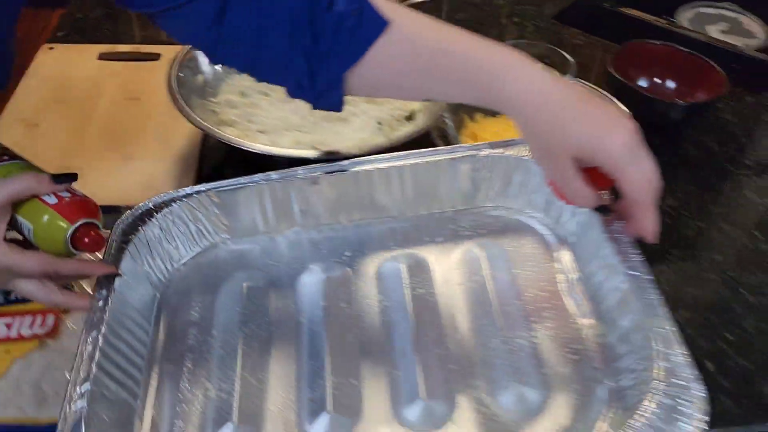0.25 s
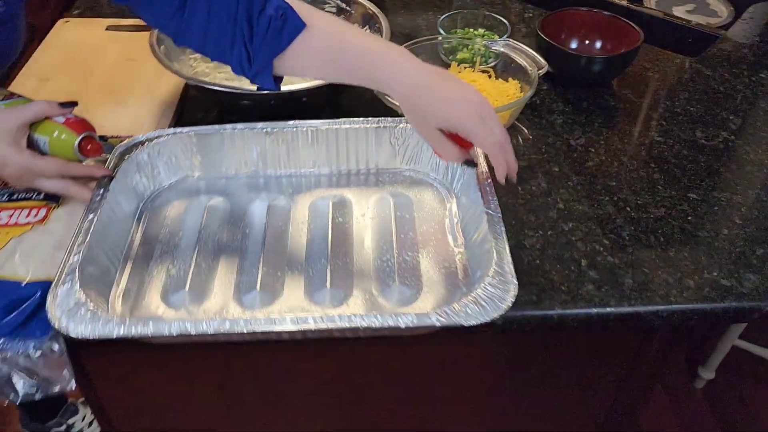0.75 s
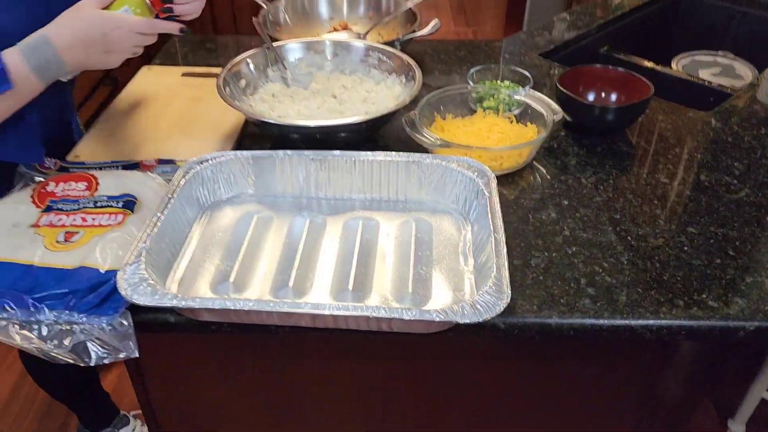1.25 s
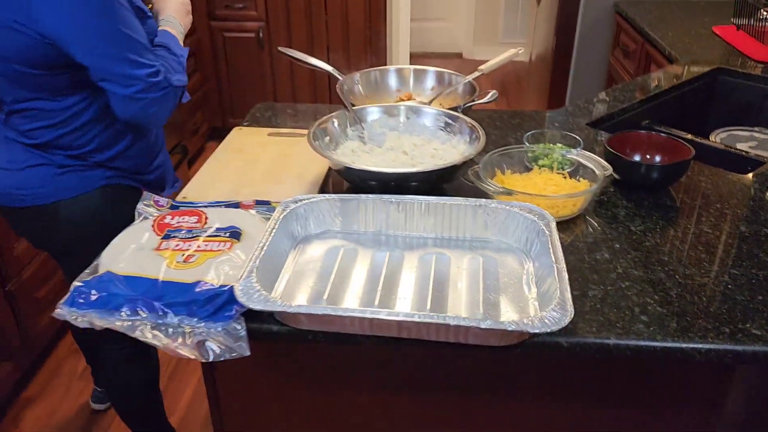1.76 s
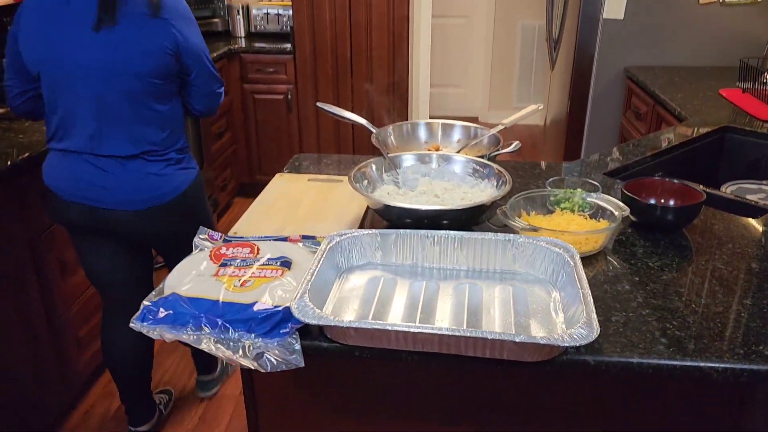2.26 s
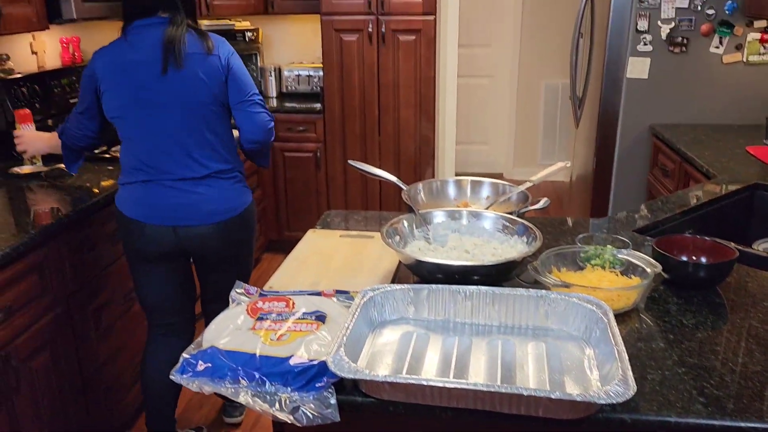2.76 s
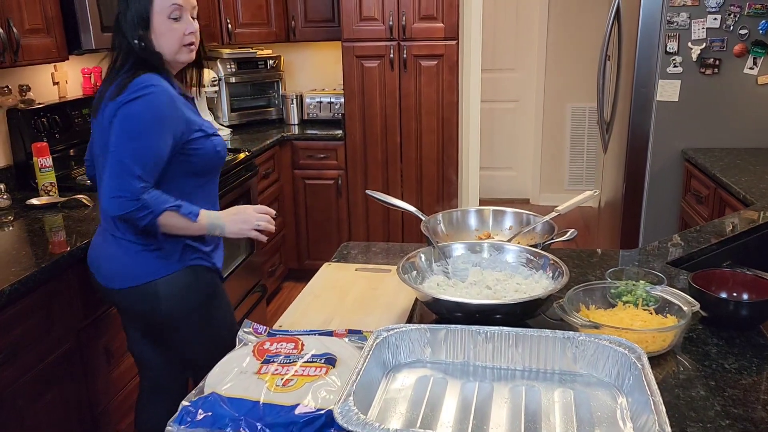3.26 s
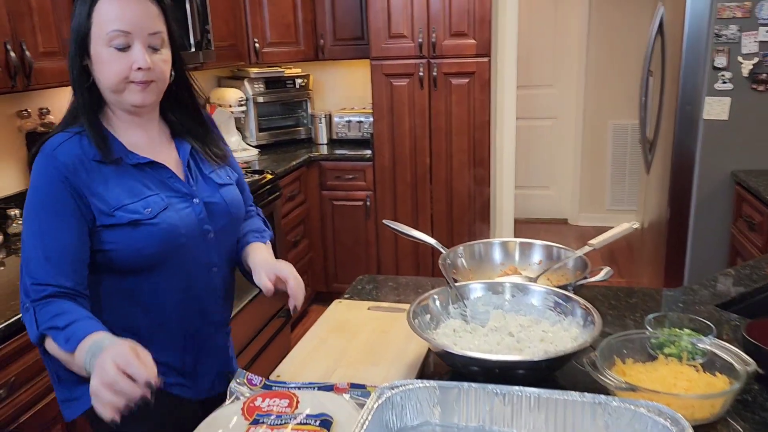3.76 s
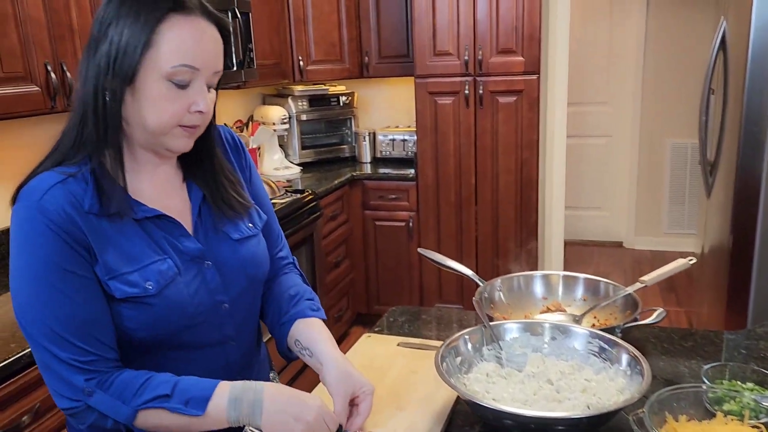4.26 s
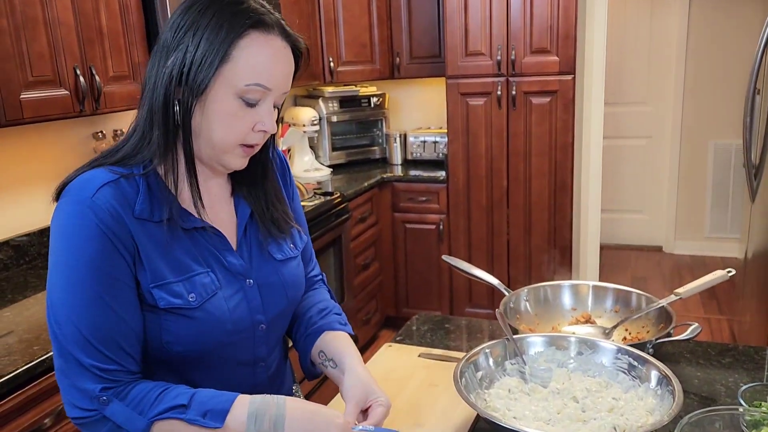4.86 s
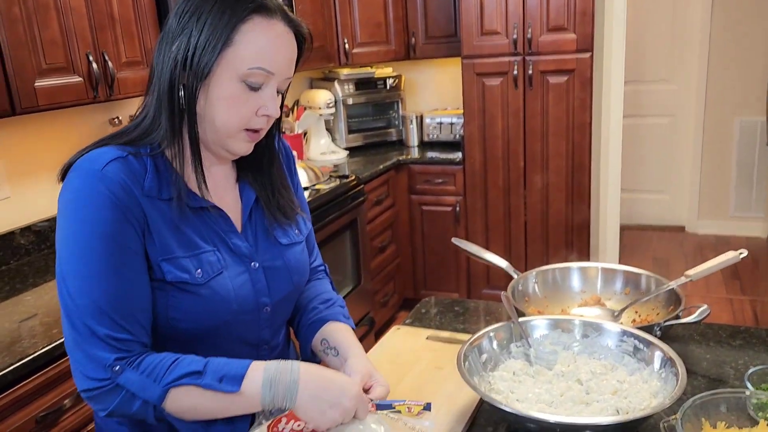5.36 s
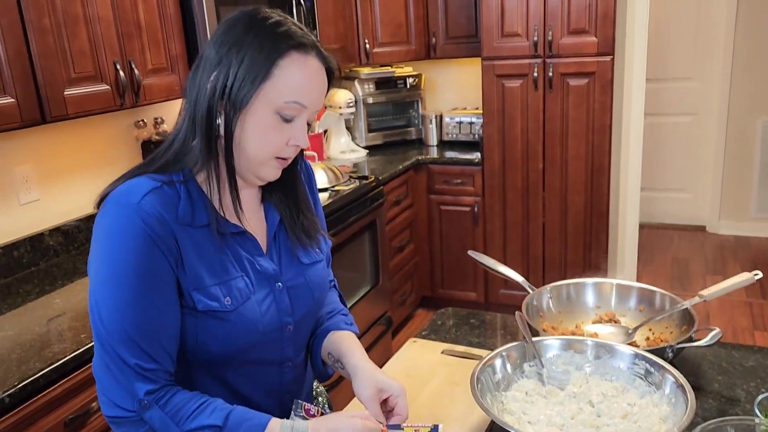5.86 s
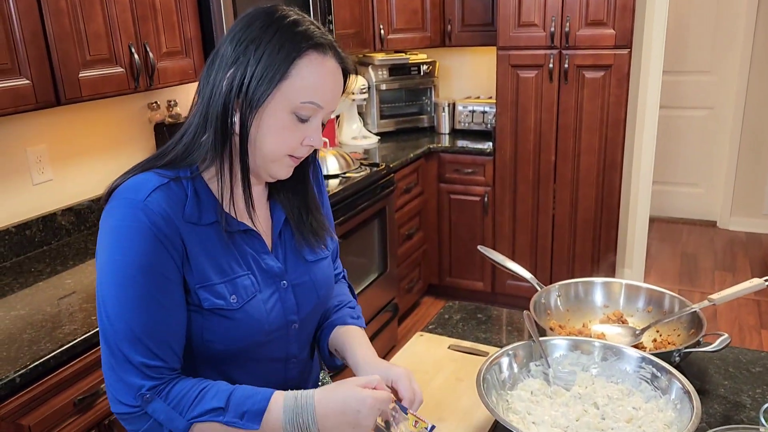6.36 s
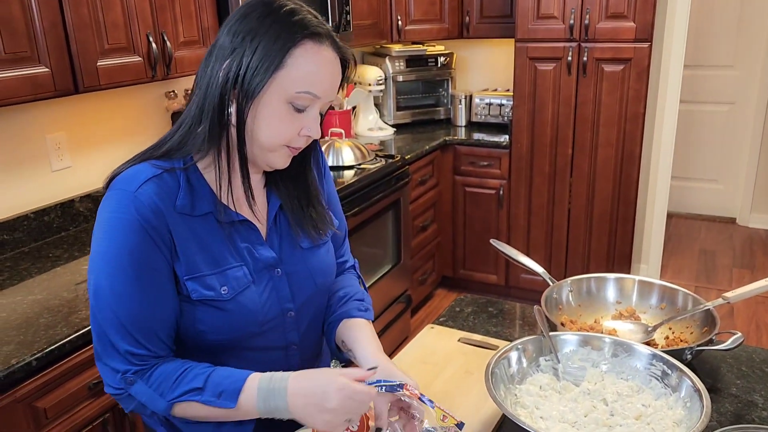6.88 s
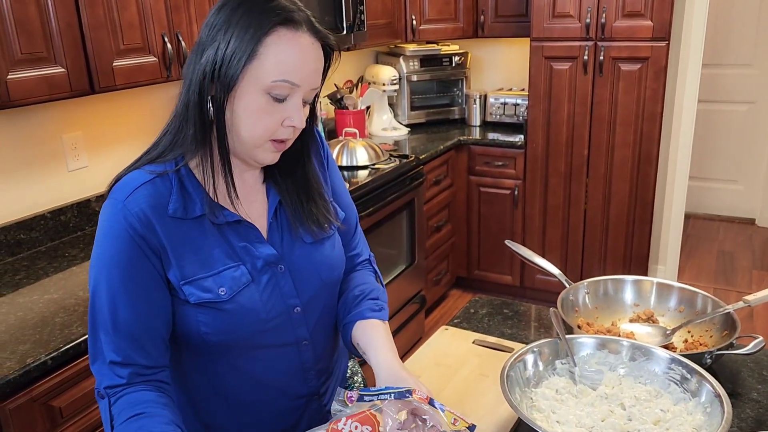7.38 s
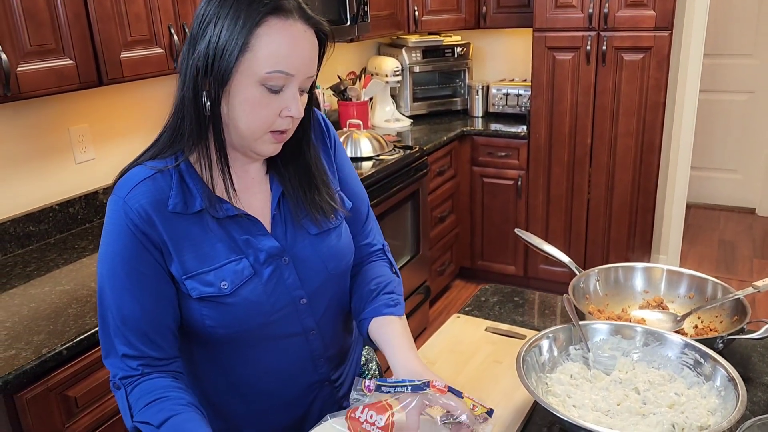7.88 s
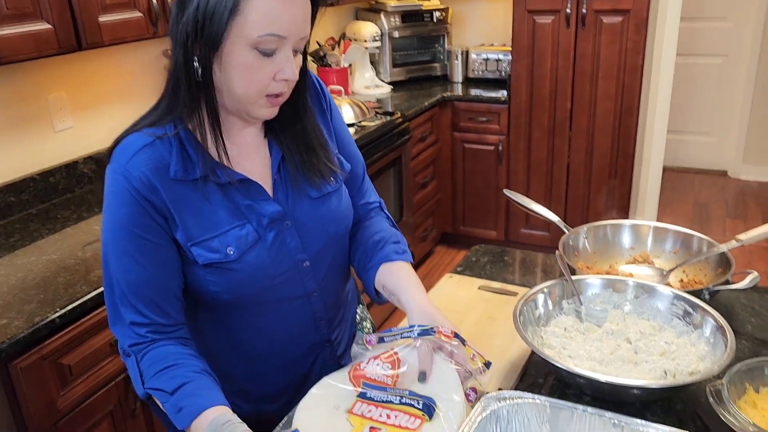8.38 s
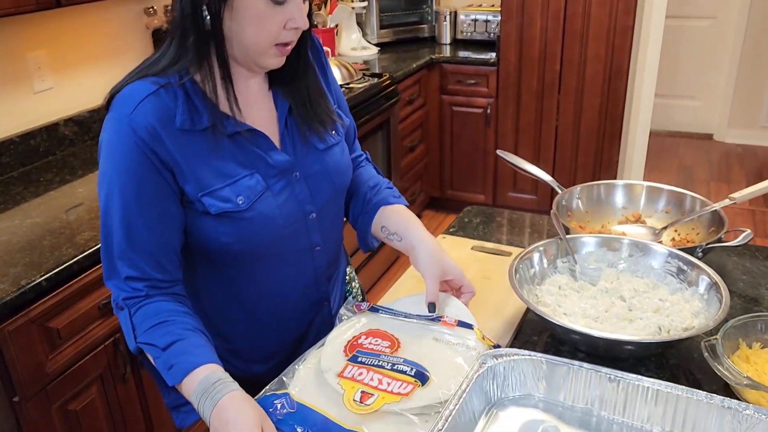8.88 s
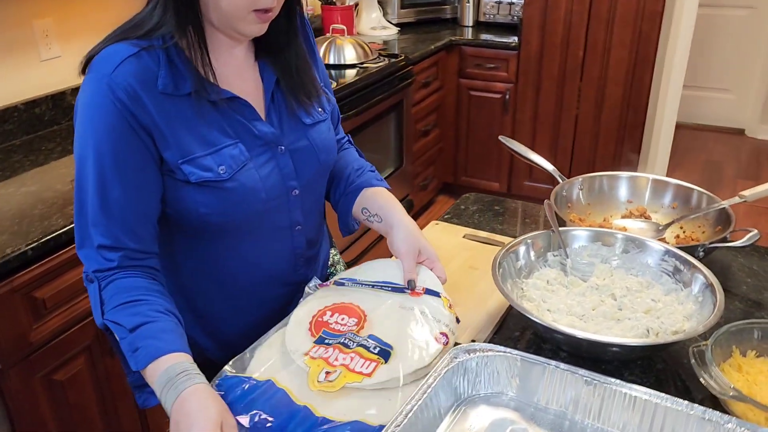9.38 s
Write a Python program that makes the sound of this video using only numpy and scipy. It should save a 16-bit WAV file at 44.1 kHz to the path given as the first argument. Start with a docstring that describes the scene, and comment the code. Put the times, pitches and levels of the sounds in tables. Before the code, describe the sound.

A tiny spray spurt, a foil pan knocking on stone, a can capped and set down, then a plastic bag popped open and crinkled.

```python
"""An oil spray gives a last short spurt as foil brushes, over the low hum of appliances in a kitchen.
A foil pan then knocks on the stone counter, and the can is capped and set down further off.
At last a plastic bag's zip pops open and the bag is crinkled and pulled back. Shaped noise makes the hiss,
hum and rumble, short pushes and ringing tones the knocks, and random tiny buckles the crinkling.
Hard cabinets ring briefly after each sound; a hand-held phone hears it all at two ports."""
import sys
import numpy as np
from scipy import signal
from scipy.fft import rfft, irfft, next_fast_len
from scipy.io import wavfile
from scipy.ndimage import uniform_filter1d

SR = 44100
rng = np.random.default_rng(int(sys.argv[2]) if len(sys.argv) > 2 else 0)


def output_pcm(signal):
    """Save a mono or channel-first signal as 16-bit PCM at the path in sys.argv[1].

    Samples are clipped to [-1, 1] before scaling.
    """
    pcm = np.clip(np.atleast_2d(signal).T, -1, 1) * 32767
    wavfile.write(sys.argv[1], SR, np.round(pcm).astype(np.int16))


N = 424683
TIME = np.arange(N) / SR
RING = TIME[:SR // 2]  # the half second in which one short sound dies away
PORT_GAP_M = 0.15
LEAD_OBJECTS, LEAD_BAG = 8, 3  # samples by which the left port hears the sound first


def amp(db):
    """Turn decibels into gain."""
    return 10 ** (np.asarray(db) / 20)


def along(points, hz):
    """Read a value between (frequency, value) points, on a log-frequency axis."""
    f, value = np.transpose(points)
    return np.interp(np.log(hz + 1e-3), np.log(f), value)


def colour(x, points, tilt_db=0):
    """Filter with the given spectrum, never ringing ahead of the sound; tilt is in dB per octave."""
    size = 2 * next_fast_len(len(x) // 2 + SR // 20)
    hz = np.arange(size // 2 + 1) * SR / size
    # the tilt turns about 1500 Hz and is flat outside 500 to 5000 Hz
    db = along(points, hz) + tilt_db * np.log2(np.clip(hz, 500, 5000) / 1500)
    # folding the cepstrum (spectrum of the log spectrum) gives the filter that responds soonest
    cepstrum = irfft(np.log(amp(db)))
    cepstrum[1:size // 2] *= 2
    cepstrum[size // 2 + 1:] = 0
    response = np.exp(rfft(cepstrum))
    return irfft(rfft(x, size) * response, size)[:len(x)]


def unit(x):
    """Scale to an average (rms) level of 1."""
    return x / np.sqrt(np.mean(x ** 2))


def crest(x, size=132):
    """Scale so that the loudest three milliseconds have rms 1."""
    return x / np.sqrt(uniform_filter1d(x ** 2, size).max())


def fade(t60):
    """Exponential decay that falls 60 dB in t60 seconds."""
    return amp(-60 * RING / max(t60, 1e-4))


def add(track, s, x):
    """Mix x into the track from time s, in seconds."""
    i = max(int(s * SR), 0)
    track[i:i + len(x)] += x[:N - i]


def panned(x, pan_db):
    """Lean a stereo sound to the left by pan_db; a negative value leans it right."""
    return x * amp(np.array([[pan_db], [-pan_db]]) / 2)


def stroke(start_s, hold_s, db, growth_db, attack_s, release_s):
    """Gain of one movement: an attack, a hold that grows by growth_db around its level, and a release."""
    hold_s, gain = max(hold_s, 1e-3), np.zeros(N)
    t = TIME[:int((hold_s + release_s) * SR)]
    level_db = db + growth_db * (np.minimum(t / hold_s, 1) - 0.5)
    rise = np.minimum(t / attack_s, 1)
    fall = np.exp(-np.log(1000) * np.maximum(t - hold_s, 0) / release_s)  # 60 dB in release_s
    add(gain, start_s, rise * amp(level_db) * fall)
    return gain


def diffuse(size):
    """Spectrum of noise from all sides at two ports: alike in the bass, unrelated in the treble."""
    mid, side = rfft(rng.standard_normal((2, size)))
    hz = np.arange(len(mid)) * SR / size
    alike = 0.98 * np.sinc(2 * hz * PORT_GAP_M / 343)  # 343 m/s is the speed of sound
    shared = mid * np.sqrt((1 + alike) / 2)
    opposed = side * np.sqrt((1 - alike) / 2)
    return hz, shared + np.array([[1], [-1]]) * opposed


# how long the room rings at each pitch: (frequency [Hz], time to fall 60 dB [s])
ROOM_DECAY = [(200, 0.38), (700, 0.4), (2000, 0.38), (5000, 0.38), (10000, .33), (15000, 0.25)]


def kitchen(x, room_db, lead, gap_s=0.0012, build_s=0.0008):
    """Direct sound, at the left port `lead` samples early, and a dense tail from cabinets and stone."""
    hz, noise = diffuse(len(RING))
    build_up = 1 - np.exp(-np.maximum(RING - gap_s, 0) / build_s)
    edges = np.append(0, SR / 2 ** np.arange(8.5, 0.9, -0.5))  # half-octave bands
    tail = 0
    for lo, hi in zip(edges, edges[1:]):
        band = irfft(noise * ((hz >= lo) & (hz < hi)), len(RING))
        band = band * fade(along(ROOM_DECAY, (lo + hi) / 2)) * build_up
        tail = tail + unit(band) * np.sqrt((hi - lo) * 2 / SR / len(RING))
    direct = np.array([x, np.pad(x, (lead, 0))[:N]])
    return direct + amp(room_db) * signal.fftconvolve(x[None], tail)[:, :N]


def contact(rattle_db, t60, size=121, rise_share=0.23):
    """One sharp push and the brief irregular chatter that follows it, with no colour of its own."""
    chatter = rng.standard_normal(len(RING)) * (fade(t60) - fade(t60 * rise_share))
    push = amp(rattle_db) * unit(chatter) / np.sqrt(len(RING))
    push[0] += 1
    # even out the broad shape of the spectrum
    power = uniform_filter1d(np.abs(rfft(push)) ** 2, size)
    flatten = np.c_[np.linspace(1, SR / 2, len(power)), -10 * np.log10(power + 0.02)]
    return colour(push, flatten)


# bright edge of ticks: (frequency [Hz], level [dB])
TICK_SPECTRUM = [(600, -14.5), (2000, -3.5), (4000, 4), (5700, 5.5), (9000, -2.5), (12000, -3), (15500, -4)]


def knocks(rows, spectrum, modes, tick_colour, ring_db, rattle_db, rattle_s, tick_s):
    """Each blow gives a coloured thud, a bright tick, and sets the object's modes (own tones) ringing."""
    out = np.zeros(N)
    for s, body_db, tick_db, tilt_db in rows:
        thud = crest(colour(contact(rattle_db, rattle_s), spectrum, tilt_db))
        ring = 0
        for hz, db, t60 in modes:
            struck_hz = hz * (1 + 0.0018 * rng.standard_normal())  # a little different at every blow
            ring = ring + amp(db) * fade(t60) * np.sin(2 * np.pi * struck_hz * RING)
        body = thud + amp(ring_db) * crest(ring)
        tick = crest(colour(contact(6.5, tick_s), tick_colour))
        add(out, s, amp(body_db) * body + amp(tick_db) * tick)
    return out


# tones of a buckling patch: (multiple of its pitch, level [dB])
PATCH_TONES = [(.76, -4), (1, 8), (1.2, -3.5)]
# lower sound of shaken sheets, also used by rustle: (frequency [Hz], level [dB])
FLUTTER_SPECTRUM = [(250, -7), (500, -7), (750, 1.5), (1150, -1), (1500, 3), (2100, 6), (2900, -5.5),
                    (4500, -4), (8000, -60)]


def snaps(rows, swing_s, tick_s, body_db, tick_db, thump_db):
    """A patch buckles and swings briefly around its own pitch, with a bright tick from its edge."""
    out = np.zeros(N)
    for s, swing_db, hz, edge_db in rows:
        swing = sum(amp(db) * np.sin(2 * np.pi * ratio * hz * RING) for ratio, db in PATCH_TONES)
        swing = swing * fade(swing_s) * (1 - np.exp(-hz * RING))  # it builds up over about one cycle
        thump = crest(colour(contact(0, 0.0048), FLUTTER_SPECTRUM))
        body = crest(crest(swing) + amp(thump_db) * thump)
        tick = crest(colour(contact(53, tick_s), TICK_SPECTRUM))
        add(out, s, amp(body_db + swing_db) * body + amp(tick_db + edge_db) * tick)
    return out


def creases(per_s, spread_db, bunching=0.8, size=350):
    """Random tiny buckles of very unequal size, whose chance rises and falls so they come in bunches."""
    bunch = np.exp(bunching * unit(uniform_filter1d(rng.standard_normal(N), size)))
    chance, sign, strength = rng.random(N), rng.choice([-1, 1], N), rng.exponential(size=N)
    happens = chance < per_s / SR * bunch / bunch.mean()
    return happens * sign * amp(spread_db * np.minimum(strength, 4))


# bright crackle of small creases: (frequency [Hz], level [dB])
CRACKLE_SPECTRUM = [(1500, -6.5), (3000, 4.5), (4500, 1.5), (7000, -3.5), (9500, -6), (12000, -0.5),
                    (15500, -6)]


def rustle(moves, per_s, spread_db, crackle_db, flutter_db):
    """Small creases crackle brightly; the same buckles and larger folds shake the sheet lower down."""
    fine, folds = creases(per_s, spread_db), creases(per_s, spread_db)
    crackle = unit(colour(fine, CRACKLE_SPECTRUM))
    flutter = unit(colour(0.33 * fine + folds, FLUTTER_SPECTRUM))
    high, low = np.zeros(N), np.zeros(N)
    for start_s, hold_s, db, growth_db, over_db in moves:
        # a hand takes up the sheet over a share of the movement; the sheet settles once it stops
        effort = stroke(start_s, hold_s, db, growth_db, attack_s=0.083 * hold_s, release_s=0.24)
        high = np.maximum(high, effort)
        low = np.maximum(low, effort * amp(over_db))
    return amp(crackle_db) * crackle * high + amp(flutter_db) * flutter * low


# spectrum of the steady fan noise: (frequency [Hz], level [dB])
FAN_SPECTRUM = [(18, -39), (30, -14), (133, -8.5), (208, -14.5), (243, -11.5), (270, -15.5), (292, -16),
                (369, -12), (467, -19.5), (518, -21), (561, -26), (656, -27), (1020, -32), (2180, -30.5),
                (15500, -57)]
# appliance drone in the room: (frequency [Hz], width [Hz], level [dB])
HUMS = [(98.7, 15.7, -53.5), (135.2, 6.6, -57), (237.9, 8.2, -58.5), (299, 75, -66.5), (380.6, 42, -61.5)]


def appliances(fan_db=-49.5):
    """Steady fan noise with a few wavering hums, each a band of noise around its own pitch."""
    size = next_fast_len(N)
    hz, noise = diffuse(size)
    out = amp(fan_db) * unit(irfft(noise * amp(along(FAN_SPECTRUM, hz)), size))
    hz, noise = diffuse(size)
    for centre, width, db in HUMS:
        out += amp(db) * unit(irfft(noise / (1 + ((hz - centre) / width * 2) ** 2), size))
    return out[:, :N]


# feet tread the floor and the hand that holds the phone shifts: (start [s], hold [s], level [dB])
SHUDDERS = [(0.58, 0.1, -46), (1.33, 0.28, -51.5), (1.88, 0.13, -51), (2.298, 0.13, -43), (2.65, 0.25, -54),
            (3.25, 0.17, -48), (8.405, 0.22, -55)]
# their deep sound: (frequency [Hz], level [dB])
RUMBLE_SPECTRUM = [(15, -44), (30, 4.5), (60, -4.5), (95, 3), (140, -6), (250, -28), (600, -53.5)]


def rumble():
    """Low shudders of deep noise, the same at both ports."""
    weight = sum(stroke(s, hold_s, db, 0, attack_s=0.024, release_s=0.76) for s, hold_s, db in SHUDDERS)
    return unit(colour(rng.standard_normal(N), RUMBLE_SPECTRUM)) * weight


# small dull bumps and ticks about the kitchen:
# (time [s], relative body level [dB], pitch [Hz], relative tick level [dB])
SMALL_BUMPS = [(2.387, -39.5, 840, -78), (2.556, -42.5, 1910, -46), (3.707, -41, 880, -77),
               (4.258, -35, 700, -71)]


def bumps():
    """Small objects swing briefly at their own pitch when bumped."""
    return snaps(SMALL_BUMPS, swing_s=0.011, tick_s=0.016, body_db=-4.5, tick_db=6.5, thump_db=-8)


# the nozzle sputters, then spits out its last gas: (start [s], hold [s], level [dB], growth [dB])
SPUTTER_WHISTLE = (0.008, 0.038, -38, 5)
LAST_SPIT = (0.033, 0.012, -33, 0)
# spectrum of the hiss: (frequency [Hz], level [dB])
SPURT_SPECTRUM = [(150, -50), (500, -2), (1000, -20), (1600, -6), (2600, 1), (4200, -13), (7000, 0),
                  (15000, -12)]


def spray(whistle_hz=1520, width_hz=500):
    """Gas hisses through the nozzle for an instant and rings its narrow bore."""
    attack_s, release_s = 0.0061, 0.017
    hiss = unit(colour(rng.standard_normal(N), SPURT_SPECTRUM))
    bore = signal.iirpeak(whistle_hz, whistle_hz / width_hz, SR)
    whistle = unit(signal.lfilter(*bore, rng.standard_normal(N)))
    return (hiss * stroke(*LAST_SPIT, attack_s, release_s)
            + whistle * stroke(*SPUTTER_WHISTLE, attack_s, release_s))


# foil slides and sleeves brush: (start [s], hold [s], relative crackle level [dB], growth [dB],
# relative flutter over crackle [dB])
FOIL_BRUSHES = [(0.0, 0.15, -59.5, -3, 14), (0.28, 0.075, -60, -7, 3.5), (0.4, 0.06, -66, 3, 8.5),
                (0.6, 0.32, -60, 2, 7), (0.75, 0.0087, -47, -18, -3), (1.13, 0.018, -71.5, -7, 15.5),
                (1.45, 0.04, -67, -4.5, 15), (2.06, 0.034, -61.5, -1, -14), (2.37, 0.05, -62, 5, 7.5)]


def foil():
    """Sliding foil and sleeves rustle with many tiny, fairly equal buckles."""
    return rustle(FOIL_BRUSHES, per_s=3000, spread_db=2, crackle_db=-0.5, flutter_db=-3.5)


# foil pan meets the counter: (time [s], body level [dB], tick level [dB], tilt [dB per octave])
PAN_BLOWS = [(0.4762, -20, -32, 3), (0.4825, -32, -58, -0.5), (0.538, -30.5, -42.5, -11),
             (0.66, -45, -57, 4.5), (0.713, -44.5, -50, 2), (0.7565, -41.5, -41.5, 9),
             (0.876, -37, -42.5, 6), (0.987, -47, -78, 3)]
# spectrum of its thud: (frequency [Hz], level [dB])
PAN_SPECTRUM = [(80, -35), (140, -6), (220, -11), (300, 0), (400, -3.5), (650, 0), (900, -4), (1100, -4.5),
                (1400, -6), (2100, -11.5), (2700, -20.5), (6000, -38.5), (12000, -41)]
# its ringing tones: (frequency [Hz], level [dB], time to fall 60 dB [s])
PAN_TONES = [(314, -16, 0.14), (655, 8, 0.64), (810, -1, 0.37), (810, 14, 0.3), (1030, 11, .14),
             (1560, 0, 0.14), (1600, 1, .18), (2283, -36, 0.13)]


def pan():
    """The foil pan rattles and rings on the stone counter."""
    return knocks(PAN_BLOWS, PAN_SPECTRUM, PAN_TONES, TICK_SPECTRUM,
                  ring_db=-16, rattle_db=18, rattle_s=0.039, tick_s=0.012)


# plastic cap taps the can as it is fitted:
# (time [s], body level [dB], tick level [dB], tilt [dB per octave])
CAP_BLOWS = [(1.2612, -20.5, -45, 4), (1.2853, -28, -44.5, 2), (1.5, -37.5, -46.5, -4),
             (1.6098, -31.5, -58, 5.5), (1.647, -49, -44, -19), (1.717, -49, -46.5, 6)]
# spectrum of its thud: (frequency [Hz], level [dB])
CAP_SPECTRUM = [(400, -26), (750, -10.5), (1000, -4), (1200, -1.5), (1420, 8.5), (2000, -1), (2800, 0.5),
                (3300, -13.5), (3800, -31), (5000, -37)]
# its ringing tones: (frequency [Hz], level [dB], time to fall 60 dB [s])
CAP_TONES = [(1400, -16, .25), (1650, -4, 0.24), (1940, 12, 0.14), (2160, 0, 0.13), (2498, -16, .2),
             (2820, -12, 0.13), (2960, -3, .25)]


def cap():
    """The light cap taps the can, with little chatter and a short ring."""
    return knocks(CAP_BLOWS, CAP_SPECTRUM, CAP_TONES, TICK_SPECTRUM,
                  ring_db=-18, rattle_db=10, rattle_s=0.013, tick_s=0.016)


# the cap is pressed over the rim and snaps home:
# (time [s], relative body level [dB], pitch [Hz], relative tick level [dB])
LATCH_SNAPS = [(1.613, -41, 1010, -68), (1.631, -35.5, 1040, -61), (1.652, -40, 1060, -66),
               (1.831, -40.5, 1510, -47), (1.8358, -29, 2940, -31.5), (1.847, -32, 1940, -55)]


def latch():
    """The cap's plastic buckles over the rim and swings for an instant."""
    return snaps(LATCH_SNAPS, swing_s=0.0063, tick_s=0.0075, body_db=3, tick_db=-1.5, thump_db=-2)


# steel can lands on its rim and rocks flat:
# (time [s], body level [dB], tick level [dB], tilt [dB per octave])
CAN_BLOWS = [(2.8725, -15.5, -20, 7), (2.8825, -19, -20.5, -8), (2.895, -25.5, -47, 7),
             (2.904, -38, -51, 19)]
# spectra of its thud and of its tick: (frequency [Hz], level [dB])
CAN_SPECTRUM = [(90, -34), (170, -15.5), (350, -18), (500, -10.5), (600, -19.5), (720, -6), (1000, -2),
                (1250, -5.5), (1500, 1.5), (2000, 0), (2600, -14), (3300, -22), (4200, -38), (8000, -55)]
CAN_TICK_SPECTRUM = [(2000, -30), (3300, -3), (4200, -12), (4800, -1.5), (5700, 6.5), (6600, -5),
                     (8000, 1.5), (9100, -9), (10300, -1.5), (13000, 0), (14200, -5), (15300, 7)]
# its ringing tones: (frequency [Hz], level [dB], time to fall 60 dB [s])
CAN_TONES = [(493, 2, 0.14), (722, 1, 0.11), (963, 6, 0.1), (1104, -12, 0.28), (1720, -21, .3),
             (1760, -15, .25), (1930, 6, 0.21), (1970, 6, 0.39), (2150, -2, 0.1), (2842, -11, 0.17),
             (4570, -8, 0.15), (5440, -19, .22), (5800, -21, .22)]


def can():
    """Steel knocks in quick succession and rings in many tones."""
    return knocks(CAN_BLOWS, CAN_SPECTRUM, CAN_TONES, CAN_TICK_SPECTRUM,
                  ring_db=-12.5, rattle_db=19, rattle_s=0.022, tick_s=0.012)


# the zip pops open in two tugs:
# (time [s], relative body level [dB], pitch [Hz], relative tick level [dB])
ZIP_TUGS = [(5.9814, -8, 1990, -31.5), (6.115, -8.5, 1000, -23.5)]


def zip_pops():
    """The plastic by the zip buckles and swings for a few thousandths of a second."""
    return snaps(ZIP_TUGS, swing_s=0.0075, tick_s=0.014, body_db=-6, tick_db=4, thump_db=-1.5)


# the largest creases in the bag flip over:
# (time [s], relative body level [dB], pitch [Hz], relative tick level [dB])
BAG_FLIPS = [(4.34, -31, 2080, -61), (4.4004, -37, 1750, -56), (4.425, -42, 2140, -48),
             (4.8444, -34.5, 1670, -47), (4.986, -32, 1810, -70), (5.0384, -46, 1910, -44.5),
             (5.1324, -43, 2020, -49.5), (5.217, -40, 2310, -49.5), (5.2925, -39, 2620, -51),
             (5.3373, -52, 1760, -54), (5.4956, -29, 2230, -45.5), (5.5151, -25, 1980, -50),
             (5.6, -36, 1910, -38.5), (5.6543, -48, 2110, -42.5), (5.8461, -35, 1840, -49.5),
             (6.2766, -25.5, 1960, -49), (6.3877, -40, 2090, -48), (6.4096, -44, 2070, -41),
             (6.464, -37, 1960, -48), (6.4943, -37, 1980, -38.5), (6.5095, -23.5, 2120, -48),
             (6.5359, -18.5, 1850, -32.5), (6.8407, -23, 2280, -37), (6.878, -28, 2240, -46),
             (7.0596, -34, 2140, -46.5), (7.3652, -41, 2320, -45.5), (7.5136, -34, 1690, -45.5),
             (7.5423, -45, 2210, -48), (7.7961, -43, 2160, -42.5), (7.9203, -41, 2200, -44.5),
             (8.0136, -34, 2130, -40), (8.0775, -25.5, 2800, -41), (8.1446, -32.5, 1320, -48),
             (8.3083, -48, 1350, -43.5), (8.3731, -31, 2260, -40), (8.541, -47, 2090, -43),
             (9.415, -30, 2170, -39.5), (9.4764, -39, 2010, -36.5), (9.542, -23, 2180, -31.5)]


def bag_flips():
    """Each large crease flips over with a very brief swing and a tick."""
    return snaps(BAG_FLIPS, swing_s=0.005, tick_s=0.009, body_db=-7.5, tick_db=9.5, thump_db=-3)


# the hands squeeze or pull the bag: (start [s], hold [s], relative crackle level [dB], growth [dB],
# relative flutter over crackle [dB])
BAG_PULLS = [(4.33, 0.1, -64.5, -4.5, 9.5), (4.68, 0.23, -68.5, -2, 8), (4.83, 0.19, -66, 7, 10.5),
             (5.1, 0.32, -63, 2, 2.5), (5.505, 0.1, -56.5, 13.5, 6), (5.648, 0.079, -50.5, -0.5, 4.5),
             (5.83, 0.15, -61.5, -10, 2), (6.11, 0.094, -39, -9.5, 1.5), (6.375, 0.17, -51.5, 5, -2.5),
             (6.78, 0.12, -55.5, -1, 4), (7.34, 0.23, -56.5, 7, 0), (7.64, 0.16, -63, 6.5, 5.5),
             (7.86, 0.37, -58.5, -1.5, 2), (8.275, 0.13, -48.5, 2, 0), (8.42, 0.27, -51, 5.5, 3),
             (8.7, 0.59, -67.5, 2, -1), (9.18, 0.14, -57, -3, 1), (9.3, 0.29, -48, 5.5, -1.5),
             (9.55, 0.074, -49, -11, -6)]
# between pulls the bag never lies quite still in the hands (same columns)
BAG_RESTLESS = (4.0, 5.6, -71, 3, 5)
# how much earlier the left port hears each wall of the bag: (wall 1 [samples], wall 2 [samples])
WALL_LEADS = (2, 5)


def bag_walls():
    """The two walls of the bag crinkle separately, each from its own direction."""
    film = 0
    for lead in WALL_LEADS:
        wall = rustle(BAG_PULLS + [BAG_RESTLESS], per_s=480, spread_db=5.5, crackle_db=1, flutter_db=-2.5)
        film = film + kitchen(wall, room_db=0, lead=lead)
    return film


def scene():
    """Spray and bag flips are the driest; the can, its latch and the bumps have the most room sound."""
    background = appliances() + rumble()
    nozzle = panned(kitchen(spray(), room_db=-9, lead=LEAD_OBJECTS), pan_db=-2.5)
    counter = kitchen(pan() + foil(), room_db=0.5, lead=LEAD_OBJECTS)
    capping = kitchen(cap(), room_db=0.5, lead=LEAD_OBJECTS)
    further_off = kitchen(can() + latch() + bumps(), room_db=3.5, lead=LEAD_OBJECTS)
    opening = panned(kitchen(zip_pops(), room_db=-1.5, lead=LEAD_BAG), pan_db=-1.5)
    flipping = kitchen(bag_flips(), room_db=-5, lead=LEAD_BAG)
    return background + nozzle + counter + capping + further_off + opening + flipping + bag_walls()


# how the two ports differ in colour: (frequency [Hz], left minus right [dB])
PORT_DIFFERENCE = [(300, 0), (700, -2), (1200, -5), (2100, -5.5), (3200, -.5), (5500, 0), (8000, 0),
                   (11000, 3.5), (15000, 4.5)]


def record(dry):
    """The two ports of the phone have different colours; the treble above 15750 Hz is cut."""
    ports = []
    for x, side in zip(dry, (1, -1)):
        ports.append(colour(x, [(hz, side * db / 2) for hz, db in PORT_DIFFERENCE]))
    top_cut = signal.ellip(10, 0.2, 70, 15750, fs=SR, output="sos")
    return signal.sosfilt(top_cut, ports)


dry = scene()
out = record(dry)
output_pcm(out)
```